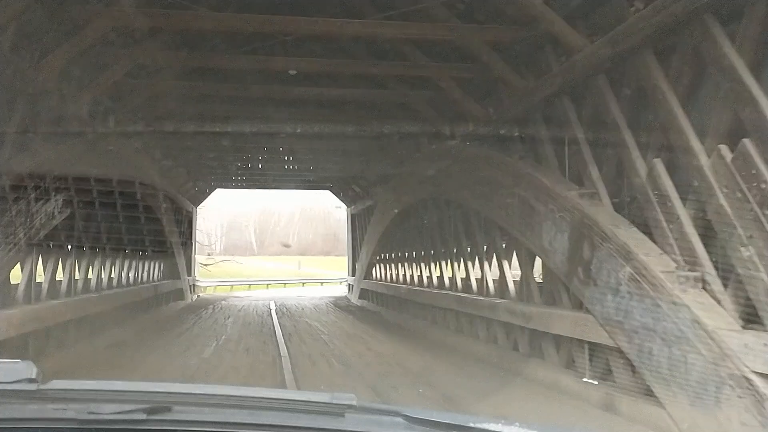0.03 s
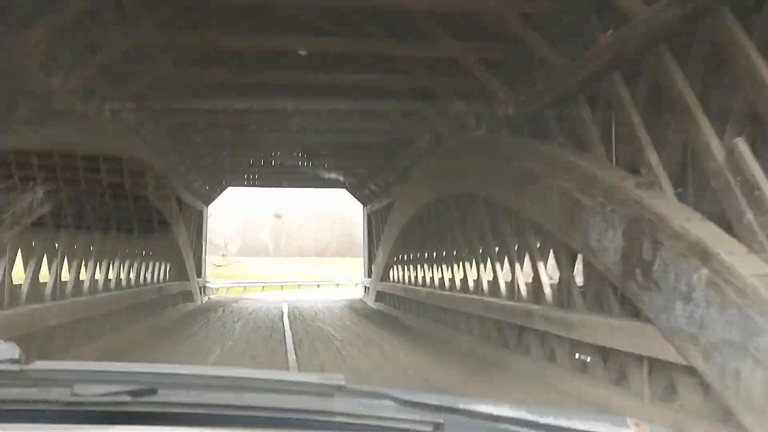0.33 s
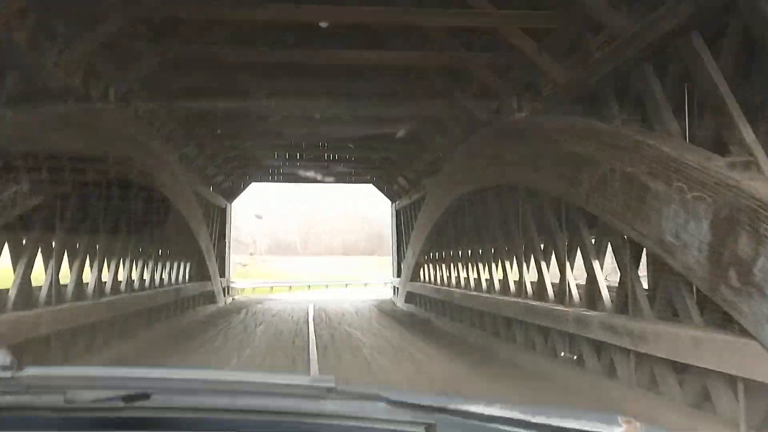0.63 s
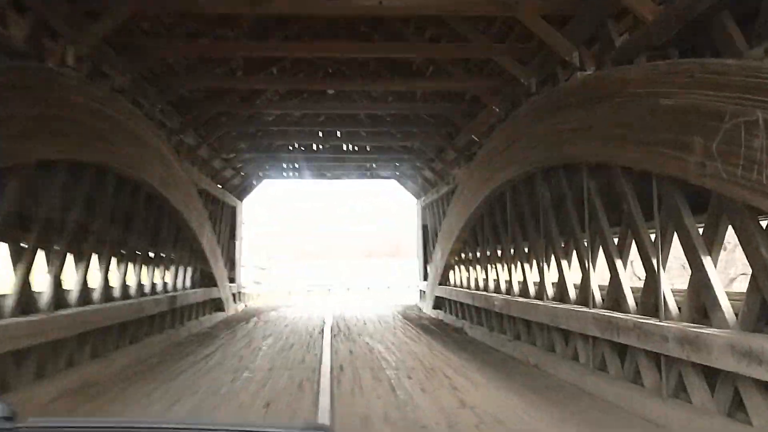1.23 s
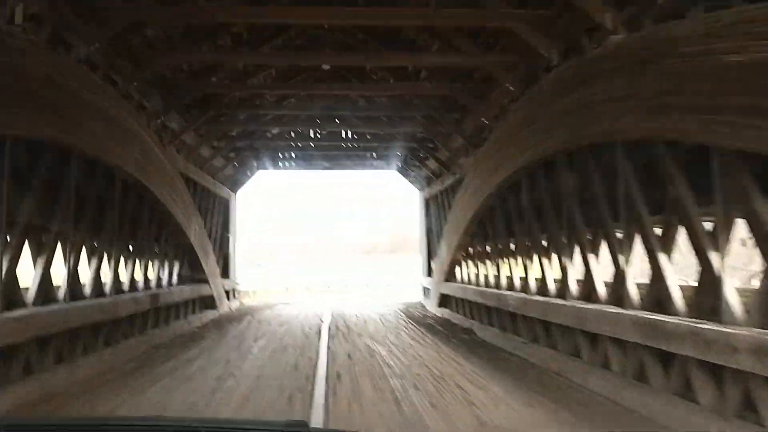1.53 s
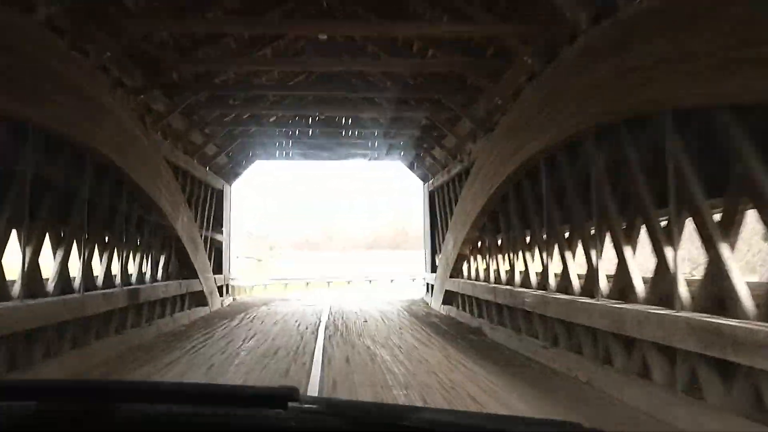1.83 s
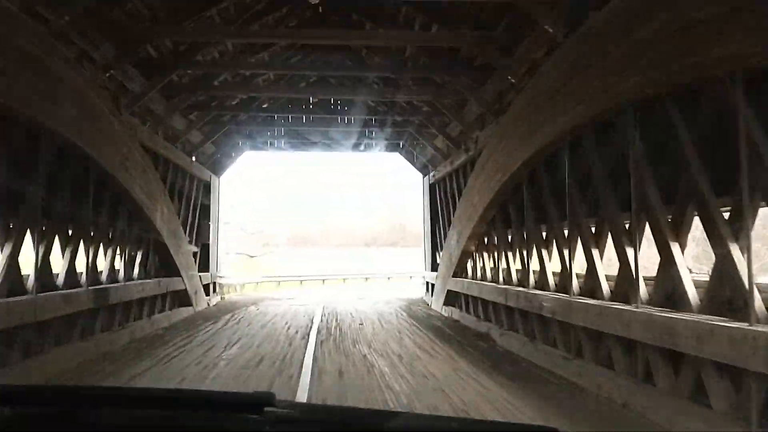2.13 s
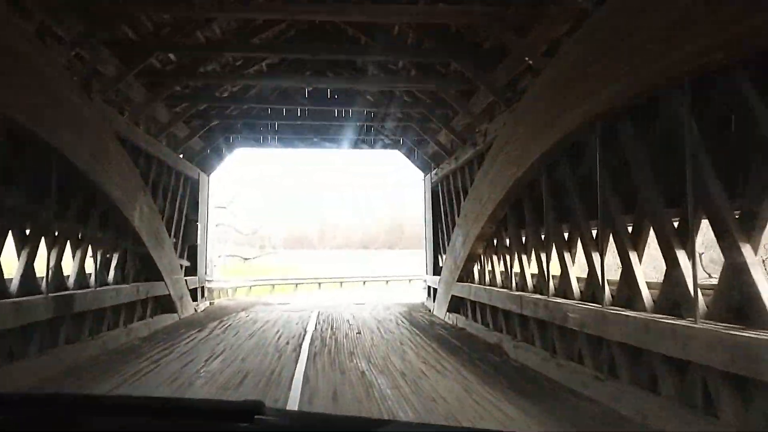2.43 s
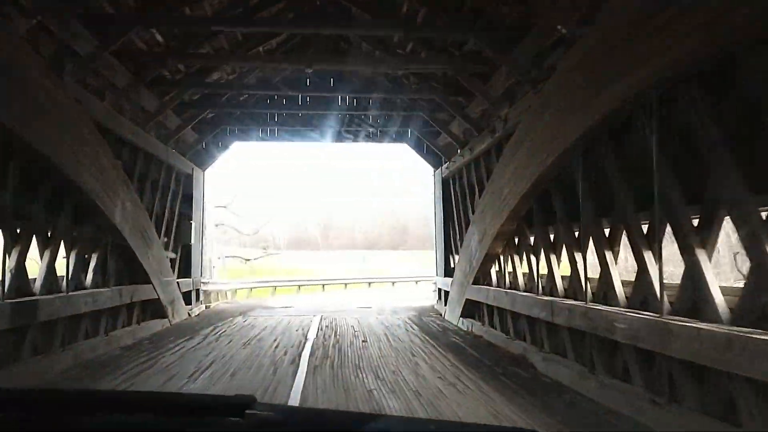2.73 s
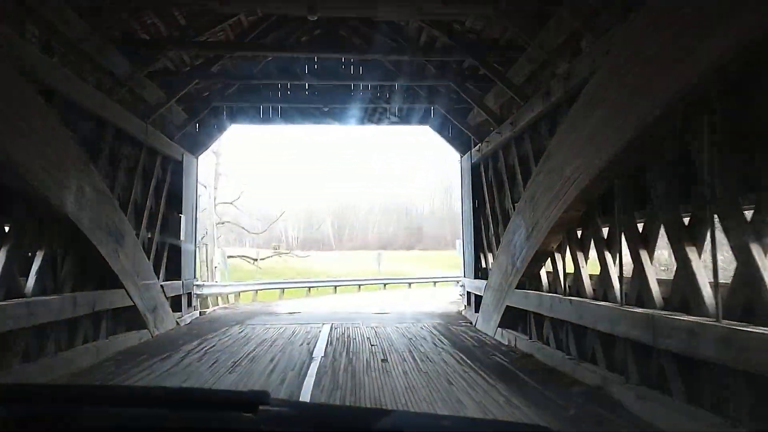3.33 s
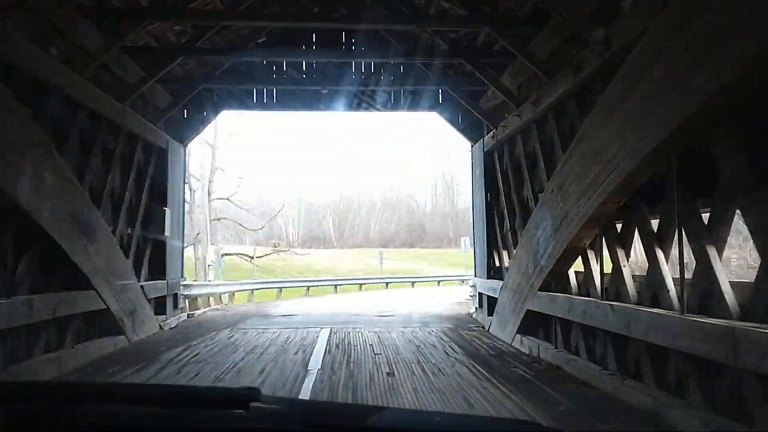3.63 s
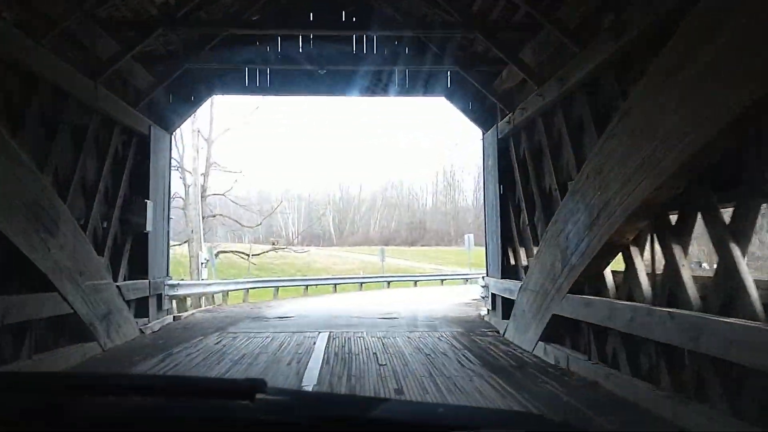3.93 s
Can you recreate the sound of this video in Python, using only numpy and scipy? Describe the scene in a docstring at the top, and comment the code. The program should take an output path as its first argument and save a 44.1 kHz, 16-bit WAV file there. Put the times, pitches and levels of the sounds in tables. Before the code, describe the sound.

Tires rumble over the planks of a covered wooden bridge, heard inside a slowly moving car. Uneven boards thump early on, then the engine hum swells and rises slightly, with faint knocks and ticking trim.

```python
"""Tyres rumble on planks, heard inside a car rolling slowly through a covered wooden bridge.
Uneven boards thump under the wheels and ring the car body. The engine hums, slowly rising in pitch,
then easing off, and narrow drones come and go in the rolling noise. Grit crunches under the tread,
planks knock with a short wooden ring and loose trim ticks in the cabin."""
import sys
import numpy as np
from scipy import signal
from scipy.fft import rfft, irfft
from scipy.io import wavfile

SR = 44100
rng = np.random.default_rng(int(sys.argv[2]) if len(sys.argv) > 2 else 0)


def log_audio(samples):
    """Write samples as a 16-bit WAV file to the path given in sys.argv[1]."""
    # one column per channel
    frames = np.atleast_2d(samples).T
    # limit to full scale, then quantise
    limited = np.clip(frames, -1, 1)
    pcm = np.round(limited * 32767).astype(np.int16)
    wavfile.write(sys.argv[1], SR, pcm)


N = 176400
T = np.arange(N) / SR


def tyres():
    """Tyres roll over the deck: a low rumble, a wavering cabin boom and a gritty hiss."""
    # level ride of the rolling noise: t/s, rumble level/dB, hiss level/dB
    rolling = [(0, -44, -67), (.35, -40, -61.5), (.55, -46, -64), (.75, -43, -64), (.95, -37.5, -58.5),
               (1.15, -42.5, -60.5), (1.35, -42.5, -61), (1.65, -39.5, -62), (2.0, -41.5, -61.5),
               (2.3, -43.5, -62.5), (2.6, -45, -64), (2.9, -42, -61.5), (3.2, -43.5, -61.5),
               (3.5, -44.5, -62), (3.72, -45, -63), (3.87, -49.5, -62), (4, -38, -65.5)]
    # rumble spectrum: f/Hz, relative level/dB
    rumble_eq = [(22, -29.5), (40, -17.5), (65, -9), (78, -7), (98, -1.5), (113, -4), (135, -3.5),
                 (152, -5.5), (185, -9), (210, -13.5), (226, -11), (265, -16.5), (315, -11), (335, -15),
                 (355, -15), (415, -23.5), (465, -20.5), (540, -30.5), (700, -39.5)]
    # tread hiss spectrum: f/Hz, relative level/dB
    hiss_eq = [(400, -5.5), (600, 5), (780, 6.5), (1000, 1), (1200, -2), (1550, -2.5), (1950, -1.5),
               (2550, -3.5), (2950, -8), (3350, -15), (4600, -14.5), (6000, -16.5), (7500, -23)]
    rumble_db, hiss_db = automation(rolling)
    rumble = from_db(-1.5) * coloured(rumble_eq)
    boom = from_db(-4.5) * wavering_tone(hz=128.95, width_hz=12.6)
    hiss = from_db(.5) * coloured(hiss_eq)
    grit = from_db(-7.5) * coloured(hiss_eq, grains())
    flicker = drift(8.2)  # lows and highs flicker together
    lows = from_db(rumble_db + .23 * flicker) * (rumble + boom)
    highs = from_db(hiss_db + .5 * flicker) * (hiss + grit)
    return lows + highs


def board_thumps():
    """Each uneven board booms briefly at its own pitch, with a rough thud, and rings the car body."""
    # a wheel meets a board: t/s, level/dB, board f/Hz, decay/s
    hits = [(.215, -30.5, 153.3, .028), (.228, -27, 205, 0.023), (.262, -27, 139, 0.03),
            (.279, -33.5, 212, 0.021), (0.301, -26.5, 162, 0.014), (0.325, -35, 252.5, .02),
            (.356, -33.5, 127, .018), (.385, -36.5, 203, 0.0157), (0.8851, -20, 212, 0.029),
            (0.9241, -22, 149.2, 0.031), (0.952, -32.5, 115, 0.012), (0.993, -34, 124.3, 0.036),
            (1.02, -29, 135.6, 0.053), (1.045, -33, 159, 0.019), (1.995, -32, 131.2, 0.047),
            (2.017, -30.5, 125.4, 0.023), (2.428, -35, 107, .02), (3.808, -36, 145, 0.024),
            (3.875, -32.5, 120, .03)]
    # car body modes: f/Hz, level/dB, t60/s
    body_modes = [(61, -17.5, .2), (92, -7, 0.099), (122, 5.5, 0.22), (156, -5.5, 0.084),
                  (187, -10.5, 0.061), (207, 1, 0.19), (236, -15, 0.065), (326, -10, 0.23), (410, -2, 0.25)]
    # spectrum of the rough thud: f/Hz, relative level/dB
    thud_eq = [(65, -1), (95, 1), (150, -1), (230, -7.5), (320, -8), (450, -14), (620, -19.5)]
    boom, load = np.zeros(N), np.zeros(N)
    for start, db, hz, decay in hits:
        push = from_db(db) * burst(start, attack_s=.001, decay_s=decay)
        boom += push * np.sin(2 * np.pi * hz * (T - start))
        load += push
    body = struck([hit[:3] for hit in hits], body_modes, width_oct=.47)
    body = signal.sosfilt(signal.butter(4, 430, fs=SR, output="sos"), body)  # soften the attack
    thud = load * coloured(thud_eq)
    low_cut = signal.butter(2, 57, "high", fs=SR, output="sos")
    return signal.sosfilt(low_cut, boom + from_db(-13) * body + from_db(-16) * thud)


def engine():
    """The engine hums, slightly wavering, with a weak sub-octave, overtones and faint steady whines."""
    # pitch of the hum: t/s, f/Hz
    pitch_curve = [(0, 153), (1.1, 154), (1.42, 158), (1.6, 158.5), (1.75, 163), (2.25, 162.4),
                   (2.75, 165.7), (2.92, 168.3), (3.48, 169.3), (3.68, 163.5), (3.82, 146.2), (4, 133)]
    # swells of the hum: t/s, level/dB
    level_curve = [(0, -46), (.55, -51), (1.15, -52.5), (1.43, -38.5), (1.65, -48), (1.92, -39.5),
                   (2.3, -42), (2.55, -48.5), (2.82, -40), (3.13, -39.5), (3.23, -45), (3.45, -38.5),
                   (3.72, -49.5), (3.85, -36), (4, -48)]
    # partials of the hum: multiple of the pitch, relative level/dB
    partials = [(.5, -23.5), (1, 1), (2, -25.5), (3, -30)]
    # whines: f/Hz, level/dB
    whines = [(465, -68), (1288, -83), (1652, -86)]
    waver_share, flutter_db = .0031, .55
    (pitch,), (level_db,) = automation(pitch_curve), automation(level_curve)
    phase = 2 * np.pi * np.cumsum(pitch * (1 + waver_share * drift(8.8))) / SR
    hum = np.zeros(N)
    for multiple, db in partials:
        hum += from_db(level_db + db - flutter_db * drift(8.6)) * np.sin(multiple * phase)
    whine = sum(from_db(db) * wavering_tone(hz, width_hz=5.35) for hz, db in whines)
    return np.sqrt(2) * hum + whine


def drones():
    """Narrow drones swell and fade in the rolling noise, climbing a little as the car gathers speed."""
    # drones: start t/s, length/s, centre f/Hz, width/Hz, level/dB
    swells = [(0, 1, 592, 4.1, -72.5), (0, 0.8, 466, 8.3, -63.5), (1.28, .87, 305, 7.5, -49.5),
              (1.3, .6, 352, 15.7, -57.5), (2.75, 0.5, 362, 12, -60), (.98, .68, 472, 9, -61.5),
              (2, .6, 310, 13.5, -61), (1.75, 0.65, 366, 10, -59.5), (3, 0.66, 660, 10, -68.5),
              (3.48, .27, 380, 80.3, -52), (2.7, .6, 526, 24, -63), (1.5, .47, 1906, 36, -71)]
    rise_per_s = .02  # share of the centre pitch
    out = np.zeros(N)
    for start, length, hz, width, db in swells:
        progress = np.clip((T - start) / length, 0, 1)
        swell = np.sqrt(np.abs(np.sin(np.pi * progress)))
        pitch = hz * (1 + rise_per_s * (T - start - length / 2))
        out += from_db(db) * swell * wavering_tone(pitch, width)
    return out


def grit_crunches():
    """Grit crunches under a loaded tyre in short sprays of tiny cracks."""
    # crunches: t/s, level/dB, decay/s
    crunches = [(0.226, -47.5, 0.048), (.257, -57.5, 0.025), (0.888, -57, 0.081), (1.044, -49.5, 0.028)]
    # spectrum of cracking grit: f/Hz, relative level/dB
    crunch_eq = [(300, 0.5), (460, 7), (700, 4), (1100, -1), (1500, -2.5), (2300, -3), (3300, -16),
                 (5500, -18.5), (7500, -27.5)]
    load = sum(from_db(db) * burst(start, attack_s=.00067, decay_s=decay) for start, db, decay in crunches)
    return load * coloured(crunch_eq, grains())


def plank_knocks():
    """Planks knock, each blow ringing the wood's modes around its own pitch."""
    # knocks: t/s, level/dB, f/Hz
    knocks = [(.171, -52.5, 924), (.329, -47, 880), (.453, -51, 800), (1.286, -48, 800), (1.997, -51, 950),
              (2.087, -50.5, 850), (2.161, -47.5, 1150), (2.232, -49.5, 850), (3.116, -53, 800)]
    # plank modes: f/Hz, level/dB, t60/s
    plank_modes = [(680, -8, 0.04), (782, -3.5, 0.081), (942, -6.5, 0.057), (990, -3, 0.045),
                   (1160, -8, 0.076), (1345, -8.5, 0.035), (1660, -1.5, 0.21)]
    return struck(knocks, plank_modes, width_oct=.45)


def trim_ticks():
    """Loose plastic trim ticks, from a thin ring to a broad snap."""
    # ticks: t/s, level/dB, share of snap against ring (0-1)
    ticks = [(.008, -64, 0.2), (0.15, -67.5, 0), (.174, -63, .1), (.286, -66, 0.9), (0.571, -64, 0.1),
             (0.663, -65.5, 0), (0.859, -57, 0.8), (0.912, -55.5, 0.7), (1.025, -56.5, 0.74),
             (1.049, -54, 0.75), (1.059, -66, 0.5), (1.184, -58, .7), (1.332, -61.5, 0.2),
             (1.503, -63, 0.2), (1.529, -62, 0.8), (1.565, -53, 0.85), (1.653, -66, 0.3), (1.729, -67, 0.3),
             (1.942, -61, 0.58), (2.019, -64.5, 0), (2.172, -61.5, 0.25), (2.241, -55, 0.98),
             (2.296, -64.5, 0.3), (2.37, -69, .2), (2.785, -66, 0.4), (2.865, -56, 0.9), (2.883, -63, 0.86),
             (3.562, -55.5, 0.83)]
    # spectrum of the thin ring: f/Hz, relative level/dB
    ring_eq = [(2500, -19), (3500, -10.5), (4150, 1.5), (4700, -3.5), (5300, -9), (6050, -3.5), (6600, -11),
               (7600, -17.5)]
    # spectrum of the broad snap: f/Hz, relative level/dB
    snap_eq = [(700, -17), (1400, 3), (2700, 10), (3500, -3), (4300, -12), (6000, -0.5), (7500, -10)]
    ring, snap = coloured(ring_eq), coloured(snap_eq)
    out = np.zeros(N)
    for start, db, share in ticks:
        blend = np.sqrt(share) * snap + np.sqrt(1 - share) * ring
        out += from_db(db) * burst(start, attack_s=.00035, decay_s=.01) * blend
    return out


def from_db(db):
    """Decibels to gain."""
    return 10 ** (np.asarray(db) / 20)


def unit_rms(x):
    """Scale to unit power."""
    return x / np.sqrt(np.mean(x ** 2) + 1e-20)


def automation(rows):
    """Join timed breakpoints with straight lines, one curve for each value column."""
    times, *columns = np.transpose(rows)
    return [np.interp(T, times, column) for column in columns]


def coloured(eq, source=None):
    """White noise or a given source, at unit power, through an EQ that rolls off beyond its ends."""
    hz, db = np.transpose(eq)
    f = np.maximum(np.arange(N // 2 + 1) * SR / N, 1)
    gain = from_db(np.interp(np.log(f), np.log(hz), db))
    skirts = np.minimum(1, f / hz[0]) ** 2 * np.minimum(1, hz[-1] / f) ** 2
    source = rng.standard_normal(N) if source is None else source
    return unit_rms(irfft(rfft(source) * gain * skirts, N))


def drift(rate_hz):
    """Slow random modulation: low-passed noise at unit power."""
    f = np.arange(N // 2 + 1) * SR / N
    return unit_rms(irfft(rfft(rng.standard_normal(N)) / (1 + (f / rate_hz) ** 2), N))


def wavering_tone(hz, width_hz, flutter_db=1.1):
    """A tone whose pitch wanders over a given width while its level flutters slightly."""
    pitch = hz + .5 * width_hz * drift(width_hz)
    flutter = unit_rms(from_db(flutter_db * drift(width_hz)))
    return np.sqrt(2) * flutter * np.sin(2 * np.pi * np.cumsum(pitch) / SR)


def burst(start, attack_s, decay_s):
    """An envelope with a quick rise and an exponential fall."""
    age = np.maximum(T - start, 0)
    return (1 - np.exp(-age / attack_s)) * np.exp(-np.minimum(age / decay_s, 20))


def struck(blows, modes, width_oct):
    """Blows ring a set of modes, most strongly those near the pitch of each blow."""
    times, db, pitch = np.transpose(blows)
    out = np.zeros(N)
    for hz, mode_db, t60 in modes:
        nearness = np.exp(-.5 * (np.log2(hz / pitch) / width_oct) ** 2)
        clicks = np.full(N, 1e-18)
        clicks[(times * SR).astype(int)] = from_db(db + mode_db) * nearness
        radius, angle = from_db(-60 / (t60 * SR)), 2 * np.pi * hz / SR
        out += signal.lfilter([0, np.sin(angle)], [1, -2 * radius * np.cos(angle), radius ** 2], clicks)
    return out


def grains(per_s=1700, spread_db=3.5):
    """Random tiny cracks of uneven size."""
    sizes = from_db(spread_db * np.minimum(rng.exponential(1, N), 4))
    signs = rng.choice([-1, 1], N)
    return sizes * signs * (rng.random(N) < per_s / SR)


def scene():
    """The mono mix heard in the cabin."""
    steady_bed = engine() + tyres() + drones()
    return (steady_bed + board_thumps() + grit_crunches() + plank_knocks() + trim_ticks())[None]


def record(dry):
    """A steep high cut takes off the top."""
    cutoff_hz = 7780
    return signal.sosfilt(signal.ellip(10, .2, 70, cutoff_hz, fs=SR, output="sos"), dry)


dry = scene()
out = record(dry)
log_audio(out)
```